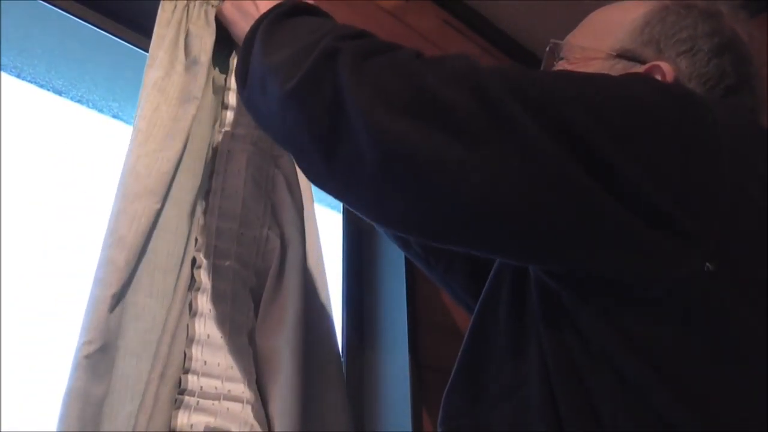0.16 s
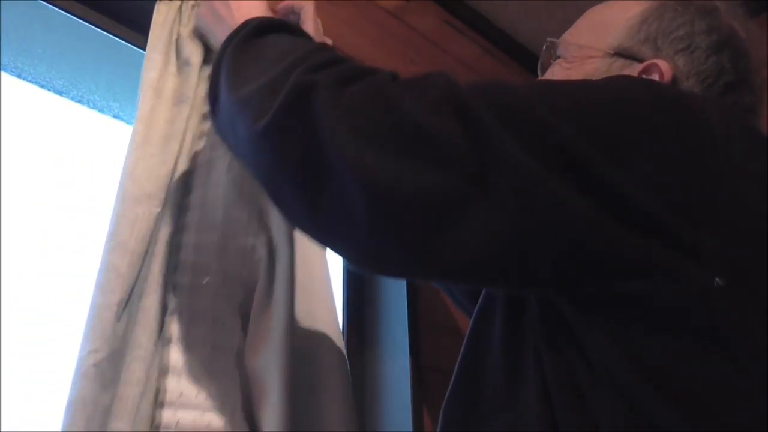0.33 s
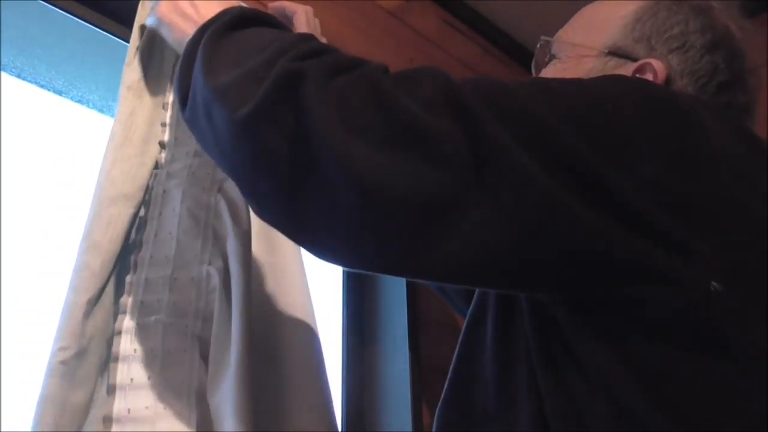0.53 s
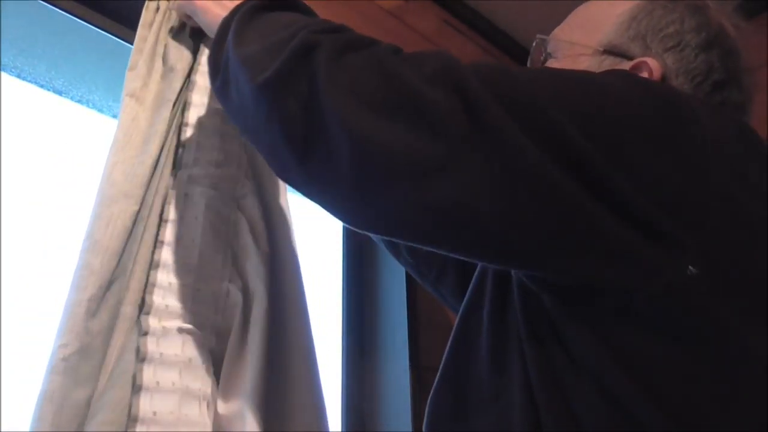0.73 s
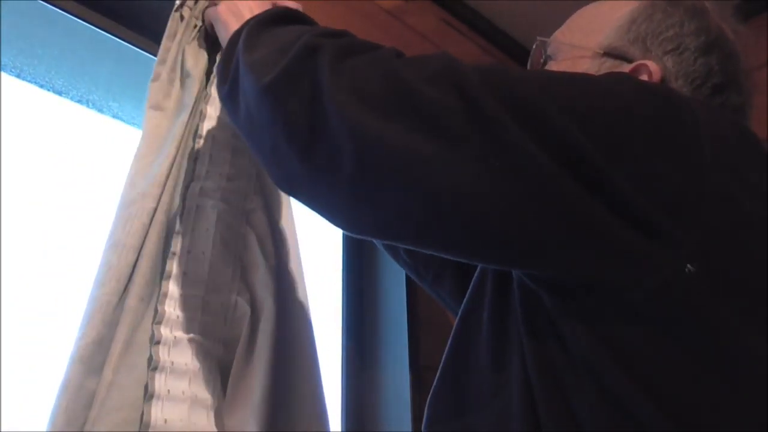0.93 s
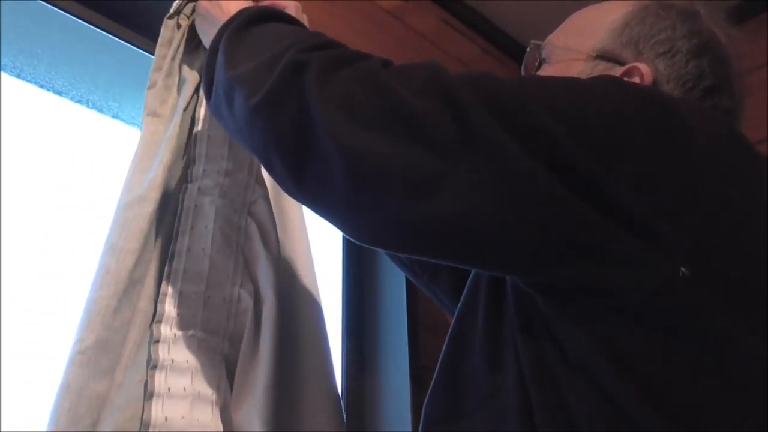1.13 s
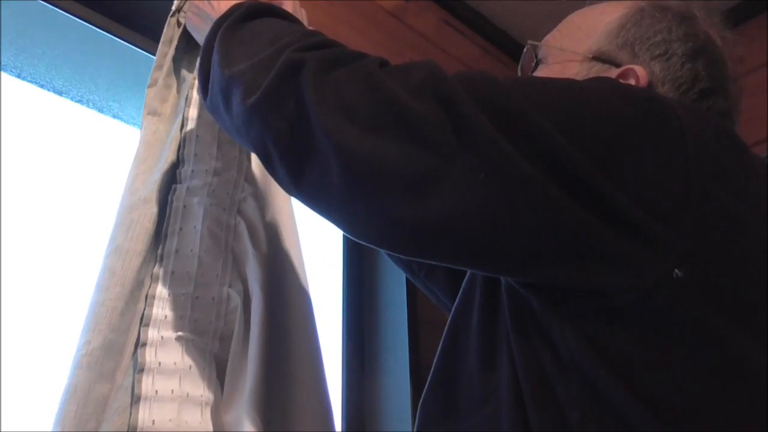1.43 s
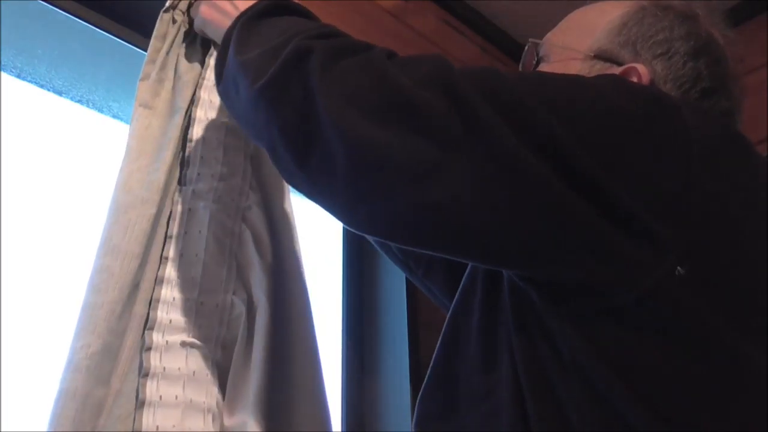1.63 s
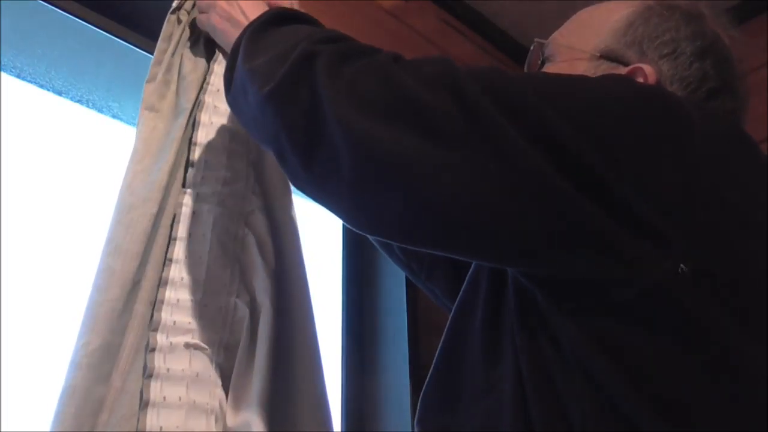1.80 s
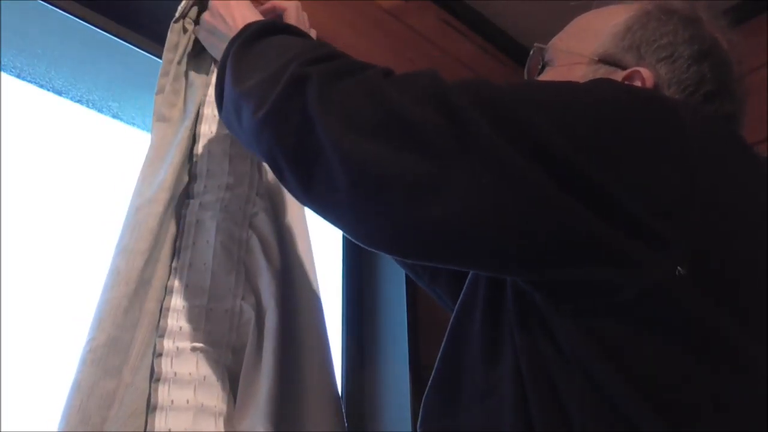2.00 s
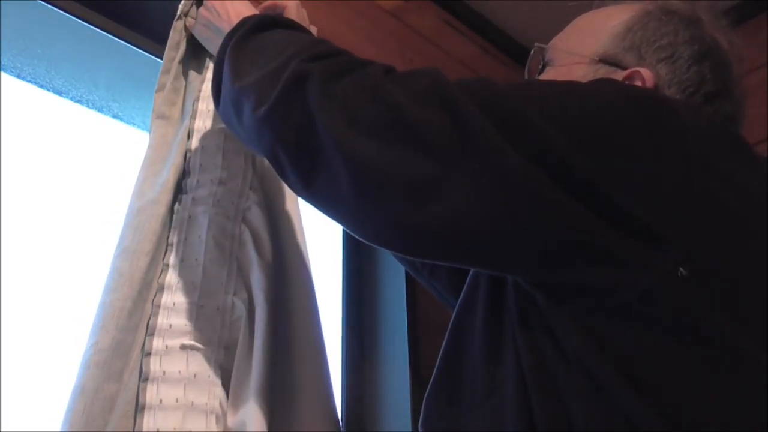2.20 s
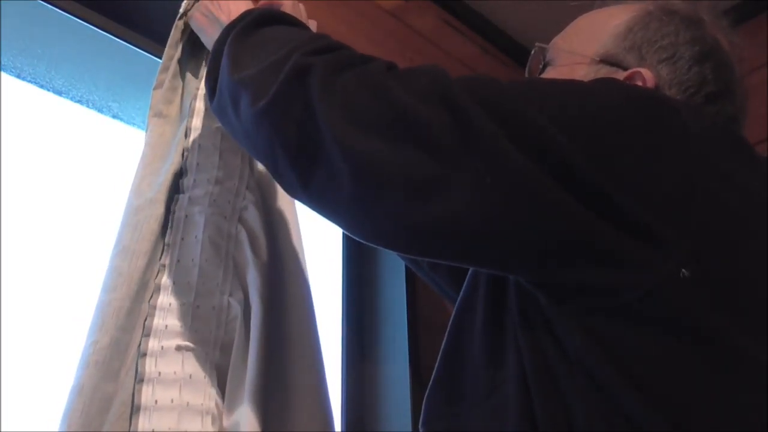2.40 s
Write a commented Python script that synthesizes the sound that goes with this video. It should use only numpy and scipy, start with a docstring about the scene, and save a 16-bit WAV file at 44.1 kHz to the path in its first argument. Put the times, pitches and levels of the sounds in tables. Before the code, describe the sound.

Curtain hooks being unclipped from a rail: hard metallic snaps, hollow rail thuds, fabric rustling

```python
"""Curtain hooks leaving their gliders

Metal hooks are pushed out of gliders on a rail, close by in a small room: noise contacts ring resonators.
They snap and tick; the rail knocks and thuds on its mounting; the timber behind it booms dully.
Cloth rustles with each move of the hands: grainy noise in three spectra under stroke envelopes.
The room adds a diffuse tail and standing waves, over a faint steady hiss of coloured noise."""
import sys
import numpy as np
from scipy import signal
from scipy.fft import rfft, irfft
from scipy.io import wavfile
from scipy.ndimage import uniform_filter1d

SR = 44100
rng = np.random.default_rng(int(sys.argv[2]) if len(sys.argv) > 2 else 0)


def int16_out(signal):
    """Quantize to a 16-bit WAV file."""
    q = np.round(np.clip(np.atleast_2d(signal).T, -1, 1) * 32767)
    wavfile.write(sys.argv[1], SR, q.astype(np.int16))


N = 112454
TIME_S = np.arange(N) / SR

# background hiss: (frequency [Hz], relative density [dB])
FLOOR_SPECTRUM = [(25, -23), (50, -6), (110, -3.5), (170, -3), (300, -0.5), (600, -1.5), (1200, -10),
                  (2000, -10.5), (2800, -18.5), (5700, -13.5), (8000, -19), (10400, -15.5), (12500, -23.5),
                  (15500, -21)]
# side against mid of diffuse sound: (frequency [Hz], ratio [dB])
SIDE_TO_MID = [(30, -8), (60, -4), (140, -2), (280, -12), (700, -3), (2000, -2.5), (5500, -7.5), (9000, -4),
               (14000, 0.5)]
# left against right: (frequency [Hz], difference [dB])
LEFT_LEAN = [(200, -1.4), (600, -0.2), (1200, 2.5), (2500, 2.2), (6000, 1), (10000, -0.5)]
FLOOR_DB, CUTOFF_HZ = -56.5, 15900

# reverberation time: (frequency [Hz], t60 [s])
TAIL_T60 = [(100, 0.18), (300, 0.12), (1000, 0.28), (5000, 0.35), (11000, 0.27)]
# reverberant against direct: (frequency [Hz], ratio [dB])
WET_TO_DIRECT = [(100, 0), (300, -1.5), (1000, -3), (3000, -3.5), (6000, -3.5), (11000, -4.5)]
# standing waves: (frequency [Hz], t60 [s], gain [dB])
STANDING_WAVES = [(168.8, 0.41, -0.5), (286.7, 0.88, -2.5), (395, 0.21, -3), (515, 0.25, -23),
                  (870, 0.38, -21)]
FIRST_ECHO_S, ROOM_EVEN_HZ = 0.0015, 63

# hand moves: (time [s], length [s], hiss [dB], rub [dB], flap [dB]), levels before CLOTH_TRIM_DB
HAND_STROKES = [(.0, 0.17, -61.5, -60.5, -73.5), (0.164, 0.092, -55, -55, -51),
                (0.323, 0.038, -58, -41.5, -43.5), (0.447, 0.17, -46.5, -48, -48.5),
                (0.543, 0.039, -58, -47.5, -69), (0.692, 0.208, -55, -52.5, -54),
                (0.861, 0.016, -58, -55, -47), (0.898, 0.16, -50, -49, -48.5),
                (0.907, 0.046, -71, -69, -50.5), (1.063, 0.15, -53, -50, -53.5),
                (1.232, .19, -60.5, -56, -59), (1.595, 0.11, -59, -60, -57),
                (1.676, 0.09, -54, -52.5, -47.5), (1.789, 0.39, -55.5, -55.5, -61),
                (2.036, 0.15, -55.5, -55, -55.5), (2.448, 0.059, -63.5, -74, -92)]
# hiss of the weave: (frequency [Hz], relative density [dB])
WEAVE_HISS = [(1800, -3), (2700, -10), (3600, -3.5), (5700, -1.5), (7500, -7), (9400, -11), (10600, -18),
              (12500, -22), (16000, -31)]
# rub of the tape: (frequency [Hz], relative density [dB])
TAPE_RUB = [(350, -2.5), (600, 0.5), (820, 3), (1100, -1), (1600, -2.5), (2100, -7.5), (2800, -27.5),
            (4500, -21)]
# flap of the folds: (frequency [Hz], relative density [dB])
FOLD_FLAP = [(50, -37), (100, -24), (165, -3.5), (205, -4), (285, 3.5), (400, -1), (520, -4.5), (800, -9.5),
             (1500, -44)]
ATTACK_S, RELEASE_S, CLOTH_TRIM_DB = 0.0072, 0.029, -1.5
GRAINS_PER_S, GRAIN_SPREAD_DB, SMOOTH_SHARE = 1800, 2.5, 0.5

# heavy pushes and tugs: (time [s], level [dB])
TIMBER_PUSHES = [(.185, -49.5), (0.248, -39), (0.331, -36.5), (1.185, -49.5), (1.236, -51.5), (1.363, -52),
                 (1.76, -46.5), (1.874, -47), (2.001, -46), (2.039, -46.5)]
# timber resonances: (frequency [Hz], width [Hz], gain [dB])
TIMBER_MODES = [(56.5, 13, -25), (108, 6.7, -9), (165.3, 15.3, -5), (229, 14, -5)]
TIMBER_S, TIMBER_TOP_HZ = 0.0086, 416

# rail hits: (time [s], thud [dB], knock [dB], knock pitch [Hz], knock width [Hz])
RAIL_HITS = [(.158, -48, -51, 620, 300), (.175, -41.5, -46, 736, 298.2), (.189, -38, -46.5, 580, 300),
             (.2465, -34.5, -31, 1210, 800), (.252, -33.5, -34, 730, 350), (.2688, -32.5, -33.5, 875, 696),
             (0.327, -25.5, -33, 990, 435), (.597, -44.5, -45.5, 550, 298), (0.8067, -45, -42.5, 1170, 900),
             (.815, -38, -48.5, 770, 298), (.874, -45, -41, 727, 60), (1.182, -55, -40, 1109, 35.3),
             (1.365, -53.5, -51.5, 1200, 736), (1.682, -60, -48.5, 1280, 600),
             (1.753, -46.5, -64, 892, 300), (1.77, -47.5, -72, 875, 300), (1.866, -39, -36, 1320, 261),
             (1.992, -35.5, -38, 970, 404), (1.9962, -32, -34.5, 1095, 363),
             (2.002, -31.5, -38.5, 900, 400), (2.018, -38, -42.5, 860, 300), (2.045, -52, -53, 940, 400),
             (2.1444, -42, -50.5, 850, 300), (2.335, -70, -58.5, 970, 500)]
# rail on its mounting: (frequency [Hz], width [Hz], gain [dB])
RAIL_MODES = [(169, 15, -12.5), (236, 67, -14.5), (296, 29, 3.5), (318, 22, -4), (367, 55, -18),
              (485, 29, -4.5), (626, 170, -9)]
# the push itself, broad and not ringing: (frequency [Hz], width [Hz], gain [dB])
PUSH_MODES = [(333, 180, -2)]
# knock partials: (multiple of the knock pitch [ratio], gain [dB])
KNOCK_PARTIALS = [(.8, -4), (1.002, 4), (1.25, -6), (1.7, -10.5)]
THUD_S, KNOCK_S, THUD_TOP_HZ, KNOCK_TOP_HZ = 0.0032, 0.004, 1065, 2130

# snaps and ticks: (time [s], click [dB], high ring [dB], contact decay [s], click high-pass [Hz])
HOOK_SNAPS = [(.176, -53.5, -66.5, 0.004, 2000), (0.2447, -38, -37, 0.0049, 3000),
              (0.2462, -22.5, -31, 0.0034, 1980), (.265, -35, -43, 0.00361, 2000),
              (.269, -28, -26.5, 0.0024, 2450), (.286, -56, -43, 0.0019, 2500),
              (0.3266, -30, -49, .004, 3000), (0.4587, -46, -61, 0.0029, 3500),
              (0.4928, -44, -53, 0.0035, 2500), (.7105, -54.5, -73, .003, 3000),
              (.807, -57, -76, 0.0032, 2500), (0.934, -48.5, -49, 0.0062, 4530),
              (0.959, -46, -58, 0.00466, 3670), (1.105, -52.5, -61.5, 0.0022, 2990),
              (1.173, -50, -54, 0.0034, 5000), (1.1809, -37.5, -47, .003, 4930),
              (1.361, -46.5, -62, 0.02, 3000), (1.655, -50.5, -67, 0.0044, 3500),
              (1.679, -56, -58, .006, 4000), (1.8665, -52, -70, 0.0039, 2000),
              (1.9961, -34, -47.5, 0.013, 1490), (2.016, -39.5, -55, .008, 2520),
              (2.03, -45, -52, 0.0063, 2980), (2.045, -42.5, -59, .004, 3000),
              (2.141, -46.5, -55.5, 0.016, 3480), (2.464, -62, -77, 0.0077, 3100)]
# hook in its glider: (frequency [Hz], width [Hz], gain [dB])
HOOK_MODES = [(1860, 170, 1), (3215, 100, -0.5), (3535, 124, 0), (4430, 610, -4), (4860, 180, 2),
              (5360, 160, 2.5), (5600, 160, 0.5), (5890, 206, 2.5), (6000, 24, -3), (6320, 130, -1.5),
              (7100, 170, -1.5), (7400, 200, -2), (8720, 2000, -7)]
# thin ring of the wire: (frequency [Hz], width [Hz], gain [dB])
WIRE_MODES = [(10280, 96, 6), (10360, 120, 6), (10810, 470, 4), (10900, 350, -28), (12700, 350, -7),
              (15900, 600, -22)]
HOOK_TOP_HZ, RING_LAG_S = 8330, 0.000017

SNAP = 2.88             # first impact, against chatter noise of unit deviation
RISE_SHARE = 0.2        # chatter rise, as a share of its decay time
CONTACT_EVEN_HZ = 30
LEVEL_WINDOW_S = 0.011  # event energy equals its level held this long


def from_db(db):
    """Decibels to gain."""
    return 10 ** (np.asarray(db) / 20)


def rms_one(x):
    """Scale to rms 1."""
    return x / np.sqrt(np.mean(x ** 2) + 1e-20)


def at_hz(points, hz):
    """Read a table on a log-frequency axis."""
    table_hz, value = np.transpose(points)
    return np.interp(np.log(hz + 1e-3), np.log(table_hz), value)


def bins(x):
    """Frequencies in Hz of the spectrum of x."""
    return np.arange(x.shape[-1] // 2 + 1) * SR / x.shape[-1]


def colour(x, spectrum):
    """Give steady noise a spectrum that falls away beyond its ends; rms 1."""
    hz = bins(x) + 1e-3
    low_skirt = 1 / (1 + (spectrum[0][0] / hz / 2) ** 2)
    high_skirt = 1 / (1 + (hz / spectrum[-1][0] / 2) ** 2)
    gain = from_db(at_hz(spectrum, hz)) * low_skirt * high_skirt
    return rms_one(irfft(rfft(x) * gain, x.shape[-1]))


def low_pass(x, hz):
    """Fourth-order low-pass."""
    sos = signal.butter(4, min(hz, 0.45 * SR), fs=SR, output="sos")
    return signal.sosfilt(sos, x)


def even(x, width_hz):
    """Whiten a short burst by its smoothed power spectrum."""
    size = x.shape[-1]
    spectrum = rfft(x, 2 * size)
    power = np.atleast_2d(abs(spectrum) ** 2).mean(axis=0)
    power = uniform_filter1d(power, max(int(width_hz * 2 * size / SR), 1))
    return irfft(spectrum / np.sqrt(np.abs(power) + 1e-12))[..., :size]


def resonate(x, modes):
    """Parallel two-pole resonances of alternating sign."""
    out = 0
    for k, (hz, width_hz, db) in enumerate(modes):
        r = np.exp(-np.pi * width_hz / SR)
        poles = [1, -2 * r * np.cos(2 * np.pi * hz / SR), r * r]
        gain = (-1) ** k * from_db(db) * (1 - r * r) / 2
        out = out + gain * signal.lfilter([1, 0, -1], poles, x + 1e-18)
    return out


def contact(decay_s, size=6000):
    """An impact and its dying chatter; long contacts start softly."""
    age = TIME_S[:size] / decay_s
    force = rng.standard_normal(size) * np.exp(-age) * (1 - np.exp(-age / RISE_SHARE))
    force[int(RISE_SHARE * decay_s * SR)] = SNAP
    return even(force, CONTACT_EVEN_HZ) * np.exp(-age ** 2 / 20)


def add(track, time_s, db, sound):
    """Place a short sound at its time and level."""
    start = max(int(time_s * SR), 0)
    sound = sound * from_db(db) * np.sqrt(LEVEL_WINDOW_S * SR / np.sum(sound ** 2))
    track[start:start + len(sound)] += sound[:N - start]


def diffuse(size):
    """White stereo noise whose side-to-mid ratio depends on frequency."""
    mid, side = rng.standard_normal((2, size))
    share = from_db(at_hz(SIDE_TO_MID, bins(mid)))
    stereo = rfft(mid) + rfft(side) * share * [[1], [-1]]
    return irfft(stereo / np.sqrt(1 + share ** 2), size)


def floor_hiss():
    """Steady diffuse noise with a fixed spectrum."""
    return from_db(FLOOR_DB) * colour(diffuse(N), FLOOR_SPECTRUM)


def room(x, size=22050, count=9):
    """Direct sound, a diffuse tail that dies band by band, and a few standing waves."""
    t, noise = TIME_S[:size], rfft(diffuse(size))
    octave = np.clip(np.log2((bins(t) + 1) / 62.5), 0, count - 1)
    tail = 0
    for k in range(count):
        decay = from_db(-60 * t / at_hz(TAIL_T60, 62.5 * 2 ** k))
        band = irfft(noise * np.maximum(1 - abs(octave - k), 0), size)
        tail = tail + band * decay
    tail = even(tail, ROOM_EVEN_HZ) * np.clip(t / FIRST_ECHO_S - 1 / 2, 0, 1)
    wet = signal.fftconvolve(x, tail, axes=1)[:, :N]
    wet = irfft(rfft(wet) * from_db(at_hz(WET_TO_DIRECT, bins(wet))), N)
    # a mode of width w falls 60 dB in ln(1000) / (pi w)
    modes = [(hz, np.log(1000) / np.pi / t60_s, db) for hz, t60_s, db in STANDING_WAVES]
    return x + wet + resonate_in_phase(x, modes)


def resonate_in_phase(x, modes):
    """Parallel resonances, all of one sign."""
    return sum(resonate(x, [mode]) for mode in modes)


def friction():
    """Fibres catch and slip in tiny grains of uneven size, over a smooth slide."""
    spread_db = GRAIN_SPREAD_DB * np.minimum(rng.exponential(1, N), 5)
    sizes = from_db(spread_db) * rng.choice([-1, 1], N)
    grains = rms_one(sizes * (rng.random(N) < GRAINS_PER_S / SR))
    return grains + SMOOTH_SHARE * rng.standard_normal(N)


def cloth():
    """Each stroke swells, holds and dies away in weave hiss, tape rub and fold flap."""
    power = 0
    for time_s, length_s, *levels_db in HAND_STROKES:
        swell = np.clip((TIME_S - time_s) / ATTACK_S + 1 / 2, 0, 1)
        fade = np.exp(-np.maximum(TIME_S - time_s - length_s, 0) / RELEASE_S)
        power = power + np.outer(from_db(levels_db), swell * fade) ** 2
    rustle = 0
    for part_power, spectrum in zip(power, (WEAVE_HISS, TAPE_RUB, FOLD_FLAP)):
        rustle = rustle + np.sqrt(part_power) * colour(friction(), spectrum)
    return from_db(CLOTH_TRIM_DB) * rustle


def timber():
    """The timber behind the rail answers a slow push with a dull boom."""
    out = np.zeros(N)
    for time_s, db in TIMBER_PUSHES:
        boom = resonate(contact(TIMBER_S), TIMBER_MODES)
        add(out, time_s, db, low_pass(boom, TIMBER_TOP_HZ))
    return out


def rail():
    """A low thud of the mounting and a hollow knock whose pitch and damping depend on the spot."""
    out = np.zeros(N)
    for time_s, thud_db, knock_db, pitch_hz, width_hz in RAIL_HITS:
        push = contact(THUD_S)
        dead = resonate(resonate(push, PUSH_MODES), PUSH_MODES)
        thud = resonate(push, RAIL_MODES) + dead
        add(out, time_s, thud_db, low_pass(thud, THUD_TOP_HZ))
        modes = [(pitch_hz * multiple, width_hz, db) for multiple, db in KNOCK_PARTIALS]
        knock = resonate(contact(KNOCK_S), modes)
        add(out, time_s, knock_db, low_pass(knock, KNOCK_TOP_HZ))
    return out


def hooks():
    """Each snap excites the hook in its glider and the thin high ring of the wire."""
    body, ring = np.zeros((2, N))
    for time_s, click_db, ring_db, decay_s, lowest_hz in HOOK_SNAPS:
        force = contact(decay_s)
        high_pass = signal.butter(4, lowest_hz, "high", fs=SR, output="sos")
        click = signal.sosfilt(high_pass, resonate(force, HOOK_MODES))
        add(body, time_s, click_db, low_pass(click, HOOK_TOP_HZ))
        add(ring, time_s, ring_db, resonate(force, WIRE_MODES))
    # the ring reaches the right channel slightly late
    late_ring = irfft(rfft(ring) * np.exp(-2j * np.pi * bins(ring) * RING_LAG_S), N)
    return body + np.array([ring, late_ring])


def scene():
    """All sources in the room, leaning mostly left above the bass, over the steady hiss."""
    sound = room(hooks() + rail() + timber() + cloth())
    lean = from_db(at_hz(LEFT_LEAN, bins(sound)) / 2 * np.array([[1], [-1]]))
    return irfft(rfft(sound) * lean, N) + floor_hiss()


def record(dry):
    """Cut the top steeply with an elliptic low-pass."""
    sos = signal.ellip(10, 0.1, 80, CUTOFF_HZ, fs=SR, output="sos")
    return signal.sosfilt(sos, dry)


dry = scene()
out = record(dry)
int16_out(out)
```